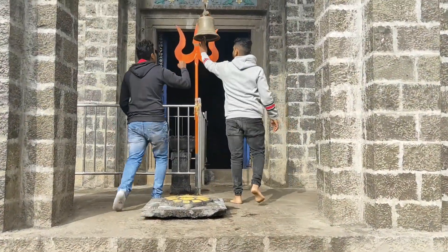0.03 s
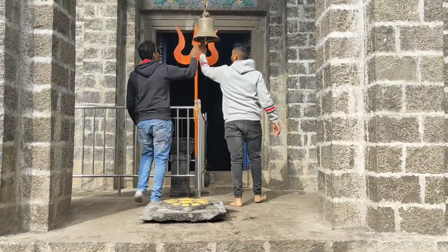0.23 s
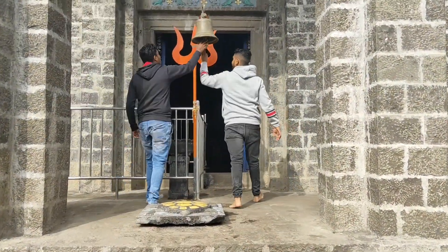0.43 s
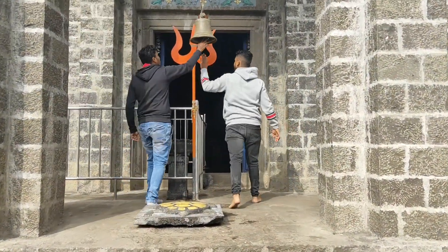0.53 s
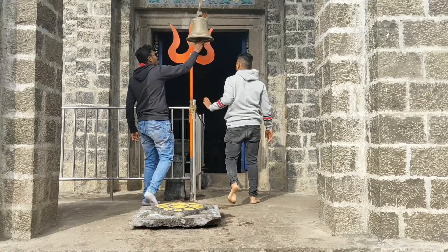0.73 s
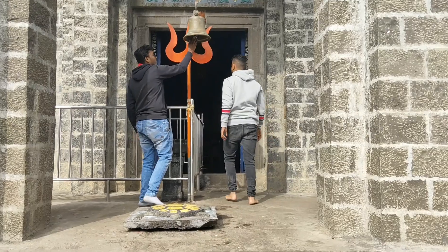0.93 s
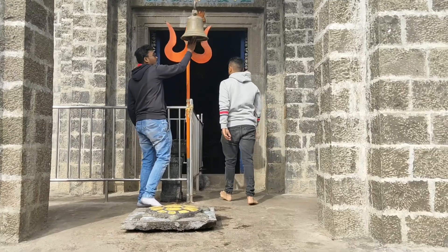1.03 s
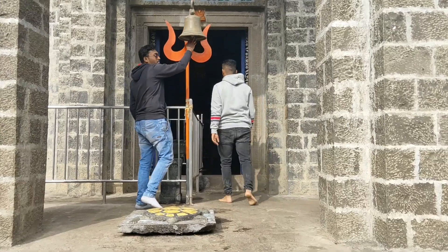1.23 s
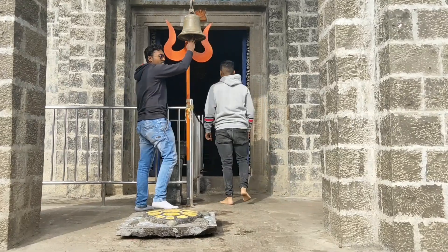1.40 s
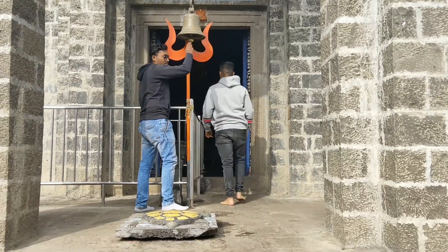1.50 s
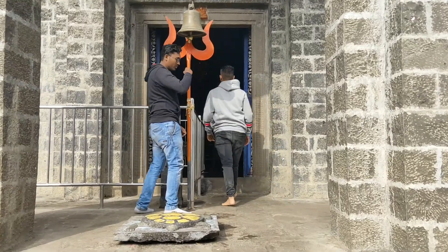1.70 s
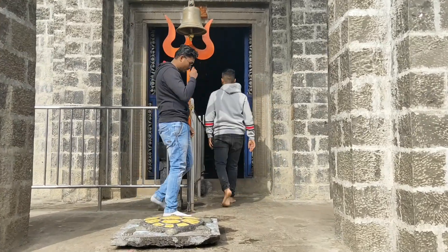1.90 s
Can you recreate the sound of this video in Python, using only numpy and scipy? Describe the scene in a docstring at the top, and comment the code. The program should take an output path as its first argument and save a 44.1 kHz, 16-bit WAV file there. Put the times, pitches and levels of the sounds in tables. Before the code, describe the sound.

A hanging bell rings three times, the last stroke rattling, with light wind on the microphone.

```python
"""Stone doorway: a brass bell's clapper is gripped, then strikes twice; split pairs of partials beat
and swell as the bell swings. The porch adds a short bright wash to each blow, and a foot shuffles.
A third, glancing stroke rattles along the rim, shakes the hanger and chokes the low partials.
Light wind buffets the microphone throughout."""
import sys
import numpy as np
from scipy import signal
from scipy.io import wavfile
from scipy.ndimage import uniform_filter1d, minimum_filter1d

SR = 44100
rng = np.random.default_rng(int(sys.argv[2]) if len(sys.argv) > 2 else 0)


def unload_wav(signal):
    """Save mono or channel-first audio to the path in sys.argv[1] as 16-bit WAV at rate SR, clipped to [-1, 1]."""
    wavfile.write(
        sys.argv[1],
        SR,
        np.round(np.clip(np.atleast_2d(signal).T, -1, 1) * 32767).astype(np.int16),
    )


N = 85995
T = np.arange(N) / SR

# clapper blows: (time [s], wash level [dB])
BLOWS = [(0.2225, -18), (1.084, -21.5)]
ATTACK_S = 0.0019
RATTLE_AT_S, RATTLE_RISE_S = 1.569, 0.03


def from_db(db):
    """Decibels to gain."""
    return 10 ** (np.asarray(db) / 20)


def at_hz(points, hz):
    """Table lookup on a log-frequency axis."""
    freqs, values = np.transpose(points)
    return np.interp(np.log(hz), np.log(freqs), values)


def in_time(rows):
    """Table columns interpolated to every sample."""
    times, *columns = np.transpose(rows)
    return np.array([np.interp(T, times, column) for column in columns])


def drift(corner_hz):
    """Slow random signal per ear, unit spread."""
    hop, settle = 100, 2000
    pole = np.exp(-2 * np.pi * corner_hz * hop / SR)
    white = rng.standard_normal((2, N // hop + settle + 2))
    slow = signal.lfilter([1], [1, -2 * pole, pole * pole], white)[:, settle:]
    slow = (slow - slow.mean(1, keepdims=True)) / slow.std(1, keepdims=True)
    return np.array([np.interp(np.arange(N) / hop, np.arange(len(ear)), ear) for ear in slow])


def rise(start_s, length_s):
    """Ramp from 0 to 1."""
    return np.clip((T - start_s) / length_s, 0, 1)


def fall(start_s, t60_s):
    """1 until start_s, then exponential decay."""
    return np.exp(-np.log(1000) * np.maximum(T - start_s, 0) / t60_s)


def build_up(start_s, share, tau_s):
    """Gain from 1 - share toward 1 as reflections pile up."""
    return 1 - share * np.exp(-np.maximum(T - start_s, 0) / tau_s)


def sides(pan_db):
    """Left and right gains, unit mean power."""
    gains = from_db(np.array([[pan_db], [-pan_db]]) / 2)
    return gains / np.sqrt(np.mean(gains ** 2))


def noise_bands(spectrum, correlation=0.16):
    """Third-octave stereo noise as (centre [Hz], band); total rms about 1."""
    edges = 24 * 2 ** (np.arange(30) / 3)
    centres = np.sqrt(edges[1:] * edges[:-1])
    gains = from_db(at_hz(spectrum, centres))
    gains /= np.sqrt(np.sum(gains ** 2 * np.diff(edges)) / (SR / 2))
    white = rng.standard_normal((2, 3, N))
    white = np.sqrt(1 - correlation) * white[:, :2] + np.sqrt(correlation) * white[:, 2:]
    for k, hz in enumerate(centres):
        bandpass = signal.butter(3, edges[k:k + 2], "band", fs=SR, output="sos")
        yield hz, gains[k] * signal.sosfilt(bandpass, white[k % 2])


def noise(spectrum):
    """Steady coloured stereo noise."""
    return sum(band for _, band in noise_bands(spectrum))


def tone(hz, ear_lag_s=0.00016, max_lag_rad=1.444):
    """One partial at both ears; sways with the swing, flutters with the reflections."""
    sway_db, sway_rad, sway_hz, flutter_hz = 1.0, 0.17, 2.7, 16.8
    lag_rad = np.array([[0], [min(2 * np.pi * hz * ear_lag_s, max_lag_rad)]])
    phase = 2 * np.pi * (hz * T + rng.random()) + lag_rad + sway_rad * drift(sway_hz)
    flutter = 0.31 * min(hz / 3000, 2)
    level = from_db(sway_db * drift(sway_hz)) + flutter * drift(flutter_hz)
    return level * np.sin(phase + flutter * drift(flutter_hz))


def wind(lumps_db=2.04, air_db=-69.5):
    """Lumpy buffets, separate at each microphone port, over quiet air."""
    # buffets: (time [s], left [dB], right [dB])
    buffets = [(0, -71, -65.5), (.2, -66, -67), (.28, -70.5, -62), (.345, -38, -57), (.394, -23, -54),
               (.425, -43, -43), (.52, -34, -50.5), (.556, -29, -55.5), (.63, -31.5, -44.5),
               (.665, -24.5, -60), (.70, -44.5, -49), (.73, -38.5, -45), (.79, -54.5, -66),
               (.92, -51, -51.5), (.975, -39.5, -54), (1.005, -61, -44), (1.028, -56, -26.5),
               (1.065, -53, -45.5), (1.15, -44, -50), (1.205, -39.5, -47.5), (1.285, -35.5, -63),
               (1.31, -42.5, -47.5), (1.39, -51, -56), (1.44, -42, -46), (1.5, -39, -41), (1.55, -51, -44),
               (1.61, -42, -45), (1.68, -64, -51), (1.77, -65, -66), (1.8, -35, -46), (1.86, -53, -57),
               (1.95, -65, -60)]
    # buffet and air spectra: (frequency [Hz], relative density [dB])
    buffet_spectrum = [(25, -21.5), (60, -3), (110, 1), (160, -2), (240, -10.5), (400, -21.5), (700, -37.5),
                       (1500, -51), (4000, -80)]
    air_spectrum = [(30, 2), (130, -4), (400, -24), (1000, -40), (4000, -46), (15000, -60.5)]
    level = from_db(in_time(buffets) + lumps_db * drift(35))
    return level * noise(buffet_spectrum) + from_db(air_db) * noise(air_spectrum)


def grip(at_s=0.13, rise_s=0.029, t60_s=0.49, roughness=0.84):
    """The clapper, taken in hand, gives a faint gritty clink."""
    # clapper modes: (frequency [Hz], level [dB])
    modes = [(340, -54.5), (385, -59), (1380, -60), (1650, -67), (1900, -68), (2520, -64.5), (3000, -70),
             (3620, -65), (5800, -75.5), (6550, -78)]
    ring = sum(from_db(db) * tone(hz) * (1 + roughness * drift(105)) for hz, db in modes)
    return ring * rise(at_s, rise_s) ** 2 * fall(at_s + rise_s, t60_s)


def struck(at_s):
    """Onset of a blow: direct sound, then first reflections."""
    return rise(at_s, ATTACK_S) * build_up(at_s, share=0.71, tau_s=0.0077)


def bell(swing_s=0.584, choke_s=0.055):
    """Strong partials: reset by each blow, swelled in turn by the swing, mostly choked by the rattle."""
    # (frequency [Hz], t60 [s], blow 1 [dB], blow 2 [dB], after rattle [dB],
    #  L-R at blow 1 [dB], L-R at blow 2 [dB], swell depth [dB], swell peak time [s])
    partials = [(468.5, 35, -37, -34.5, -39.5, 1, -2.5, 4, 0.82),
                (1016.1, 21, -25.5, -27.5, -45.5, -9, -10, 1.5, 0.61),
                (1059.9, 4.03, -15.5, -27.5, -44, -4, 5, 1, 0.76),
                (1450.2, 1.48, -23.5, -17.5, -29, 6.5, -3.5, 0.5, 0.29),
                (1494, 2.24, -20.5, -17, -34, -5.5, -29, -0.5, 0.46),
                (2175.6, 1.417, -12.5, -15.5, -34, 1.5, 3, 2, 0.9),
                (2182, 0.88, -28, -12.5, -33, 4.5, 0, 5.5, 0.56),
                (2486, 0.57, -27.5, -20, -46, 8.5, -13.5, 3.5, 0.31),
                (2544, 1.58, -31.5, -34, -29.5, -5, 17.5, 1.5, .58),
                (2858.5, 0.9, -21.5, -26.5, -29, 8.5, -1.5, 5.5, .34),
                (2901, 0.41, -16.5, -15, -17.5, 24, 16.5, 5.5, 0.64),
                (3037, 0.51, -8.5, -8.5, -31, 2, 3.5, -0.5, .45),
                (3044, 1.12, -17, -20, -24.5, 3.5, 19.5, 3.5, 0.46),
                (3101, 0.88, -25.5, -31.5, -29, 14.5, 11.5, 1, 0.21)]
    # waver of the pair near 2.2 kHz: (time [s], level [dB])
    waver = [(.24, -4), (.35, 1), (.6, -0.5), (.8, -3.5), (.9, 3), (1.03, 0), (1.13, 0.5), (1.25, 3.5),
             (1.34, -3), (1.43, -4), (1.55, 7), (1.65, -4)]
    (first_s, _), (second_s, _) = BLOWS
    choked = rise(RATTLE_AT_S, choke_s)
    out = np.zeros((2, N))
    for hz, t60_s, first_db, second_db, last_db, pan1_db, pan2_db, swell_db, swell_s in partials:
        bloom = 0.48 if hz < 2300 else 0  # low partials build up between the walls
        onset1, onset2 = [struck(s) * build_up(s, bloom, tau_s=0.069) for s in (first_s, second_s)]
        first = onset1 * (1 - onset2) * from_db(first_db) * fall(first_s, t60_s) * sides(pan1_db)
        second = onset2 * from_db(second_db) * fall(second_s, t60_s) * sides(pan2_db)
        last = from_db(last_db) * fall(RATTLE_AT_S, t60_s) * sides(pan2_db / 2)
        swing_db = swell_db * np.cos(2 * np.pi * (T - swell_s) / swing_s)
        if 2100 < hz < 2300:
            swing_db += in_time(waver)[0]
        out += from_db(swing_db) * tone(hz) * ((1 - choked) * (first + second) + choked * last)
    return out


def upper_t60_s(hz):
    """Higher modes die sooner."""
    return 0.6 * (5000 / hz) ** 0.3


def upper_partials():
    """Short high ring of the bell; each blow adds to it."""
    # (frequency [Hz], blow 1 [dB], blow 2 [dB])
    partials = [(3498, -34, -36), (4052, -23, -27), (4205, -32.5, -29.5), (4240, -24.5, -35.5),
                (4547, -29, -38), (4500, -41.5, -46), (5197, -18.5, -24.5), (5060, -34.5, -44),
                (5850, -24.5, -30), (6237, -20, -27), (6444, -15.5, -33.5), (6510, -34, -23.5),
                (6680, -27, -38), (6870, -36, -36.5), (6940, -30.5, -36.5), (7180, -32, -54),
                (7140, -37, -43.5), (7740, -33, -47), (7800, -46, -53), (8310, -36.5, -42.5),
                (9000, -43.5, -53), (9550, -40, -50), (9270, -47, -47), (10100, -45, -50.5),
                (10400, -46.5, -62.5), (11040, -51, -53), (11300, -50.5, -56), (12350, -54, -60),
                (12800, -50.5, -57.5)]
    out = np.zeros((2, N))
    for hz, *levels_db in partials:
        out += tone(hz) * sum(from_db(db) * struck(s) * fall(s, upper_t60_s(hz))
                              for (s, _), db in zip(BLOWS, levels_db))
    return out


def shimmer(count=56, spread_db=5):
    """Weak, unevenly spaced bell modes; each stroke excites them with new random strengths."""
    # (frequency [Hz], nominal level per mode [dB])
    mode_levels = [(2300, -37), (3300, -48), (3800, -45.5), (5000, -42.5), (5700, -37.5), (7000, -42),
                   (8000, -54), (10000, -62.5), (12500, -58), (15000, -58.5)]
    (first_s, _), (second_s, _) = BLOWS
    # (time [s], attack [s], gain [dB])
    strokes = [(first_s, ATTACK_S, 0), (second_s, ATTACK_S, -1.5),
               (RATTLE_AT_S + RATTLE_RISE_S / 2, RATTLE_RISE_S, 4)]
    low_hz, high_hz = mode_levels[0][0], mode_levels[-1][0]
    positions = (np.arange(count) + rng.random(count)) / count
    out = np.zeros((2, N))
    for hz in low_hz * (high_hz / low_hz) ** positions:
        level = np.zeros(N)
        for at_s, attack_s, db in strokes:
            strength = from_db(db + spread_db * np.clip(rng.standard_normal(), -2, 1))
            level += strength * rise(at_s, attack_s) * fall(at_s + attack_s, upper_t60_s(hz))
        out += from_db(at_hz(mode_levels, hz)) * level * tone(hz)
    return out


def clang(tail_db=-29.5):
    """The crash of each blow dies away in the stone porch."""
    # wash: (frequency [Hz], relative density [dB])
    spectrum = [(100, -19), (350, -8), (750, -7.5), (1200, -3), (1800, -0.5), (2800, 2.5), (3800, -7.5),
                (5000, -0.5), (6600, -16), (8500, -33), (11000, -43.5), (15000, -45)]
    # porch decay: (frequency [Hz], t60 [s])
    decay = [(200, 0.42), (800, 0.26), (3000, 0.17), (7000, 0.17), (14000, .25)]
    out = np.zeros((2, N))
    for hz, band in noise_bands(spectrum):
        t60_s = at_hz(decay, hz)
        tail_t60_s = 3.3 * t60_s / at_hz(decay, 1100)
        for at_s, db in BLOWS:
            envelope = fall(at_s, t60_s) + from_db(tail_db) * fall(at_s, tail_t60_s)
            out += from_db(db) * rise(at_s, ATTACK_S) * envelope * band
    return out


def shuffle():
    """A sole slides on stone."""
    # slide: (time [s], level [dB])
    levels = [(.3, -110), (.55, -74), (.72, -58), (.86, -61.5), (.93, -59), (1.0, -49), (1.07, -54),
              (1.2, -81), (1.4, -110)]
    # friction: (frequency [Hz], relative density [dB])
    spectrum = [(400, 8.5), (1500, 4), (4000, 1), (6500, 6), (9000, -12), (12000, -23.5), (15000, -37.5)]
    return from_db(in_time(levels)[0]) * noise(spectrum)


def rattle(level_db=-22.5, hold_s=0.032, t60_s=0.43, tail_db=-12, tail_t60_s=0.86):
    """The clapper chatters along the rim in a dense run of contacts."""
    # rim crash: (frequency [Hz], relative density [dB])
    spectrum = [(100, -23), (400, -9.5), (800, -7.5), (1100, -1.5), (1800, 0.5), (3000, 4.5), (3900, -1),
                (5300, 0.5), (6700, 0.5), (8300, -12), (10500, -21.5), (13000, -30), (15500, -36)]
    contacts_per_s, contact_s, contact_depth = 160, 0.0012, 0.55
    release_s = RATTLE_AT_S + RATTLE_RISE_S + hold_s
    decay = fall(release_s, t60_s)
    contacts = (rng.random(N) < contacts_per_s / SR) * rng.uniform(0.17, 0.97, N)
    pulses = signal.lfilter([1], [1, -np.exp(-1 / (contact_s * SR))], contacts + 1e-18)
    chatter = 1 + contact_depth * pulses * decay
    tail = from_db(tail_db) * fall(release_s, tail_t60_s)
    envelope = rise(RATTLE_AT_S, RATTLE_RISE_S) ** 2 * np.hypot(decay, tail)
    return from_db(level_db) * envelope * chatter * noise(spectrum)


def hanger():
    """The bell's hanger rings, shaken by the rattle."""
    # hanger modes: (frequency [Hz], level [dB], t60 [s])
    modes = [(740, -48, 1.5), (1075.5, -37.5, 7.5), (2026, -40, 1.11), (2084, -30, 0.86), (3120, -45, 0.72),
             (6440, -17, 0.32), (6577, -34, 0.75), (6820, -31, 0.31)]
    peak_s = RATTLE_AT_S + RATTLE_RISE_S
    ring = sum(from_db(db) * tone(hz) * fall(peak_s, t60_s) for hz, db, t60_s in modes)
    return rise(RATTLE_AT_S, RATTLE_RISE_S) ** 2 * ring


def scene():
    """Stereo mix in front of the doorway."""
    ringing = bell() + upper_partials() + shimmer() + clang()
    return ringing + rattle() + hanger() + grip() + shuffle() + wind()


def record(dry, limit=0.78, window_s=0.004, stopband_hz=16300):
    """Peak limiter, then a steep low-pass."""
    size = int(window_s * SR)
    gain = limit / np.maximum(np.abs(dry).max(0), limit)
    gain = uniform_filter1d(minimum_filter1d(gain, size), size)
    lowpass = signal.cheby2(12, 70, stopband_hz, fs=SR, output="sos")
    return signal.sosfilt(lowpass, dry * gain)


dry = scene()
out = record(dry)
unload_wav(out)
```